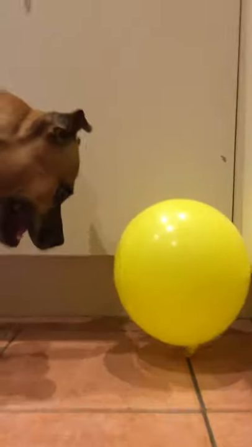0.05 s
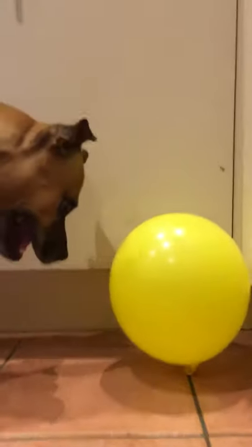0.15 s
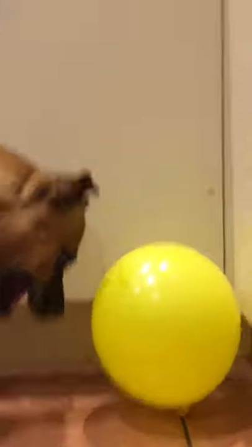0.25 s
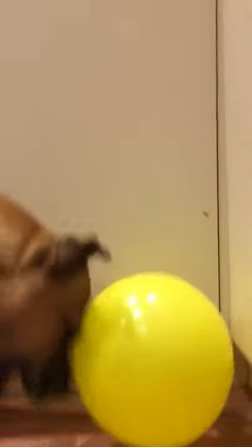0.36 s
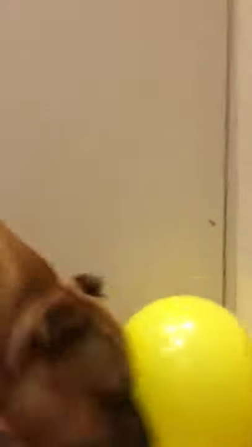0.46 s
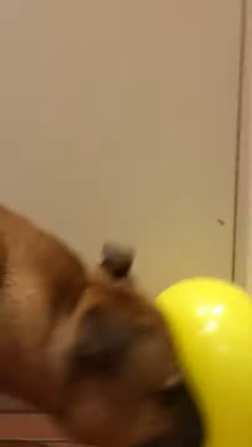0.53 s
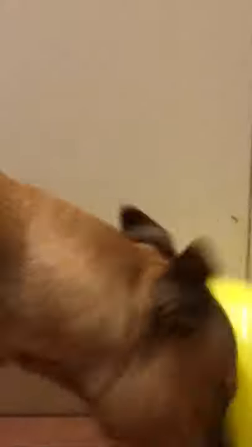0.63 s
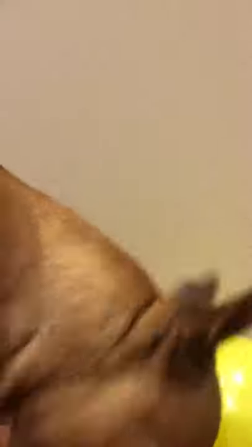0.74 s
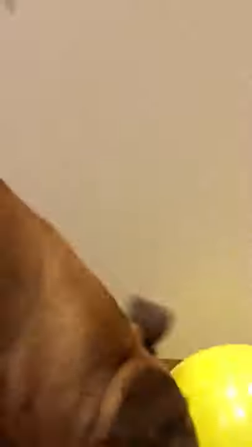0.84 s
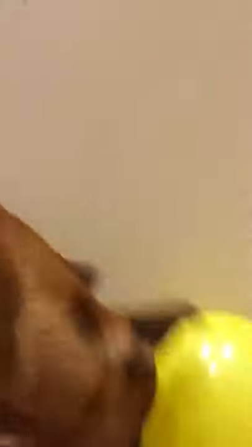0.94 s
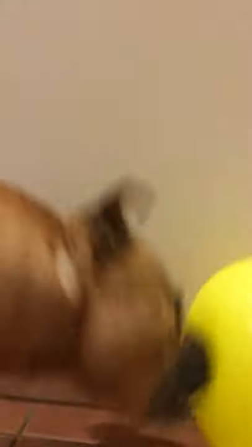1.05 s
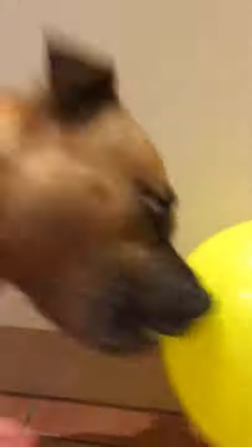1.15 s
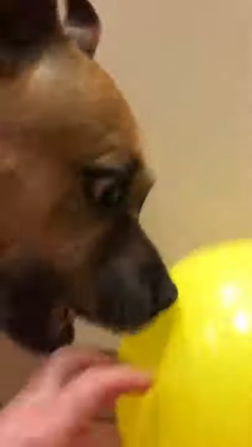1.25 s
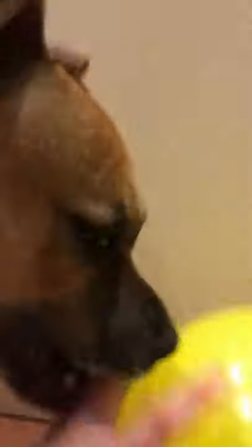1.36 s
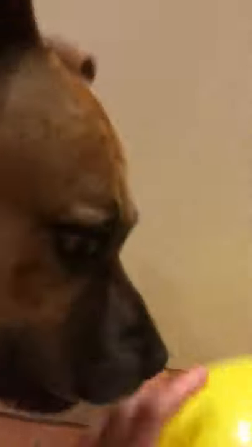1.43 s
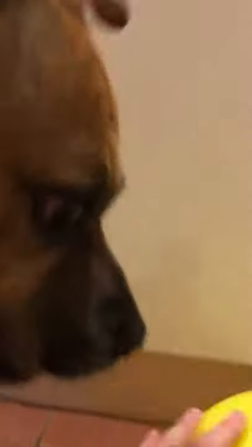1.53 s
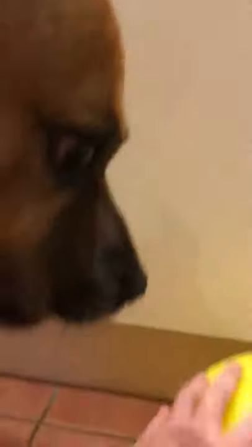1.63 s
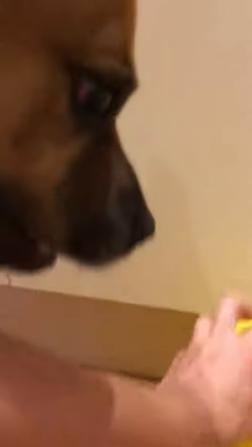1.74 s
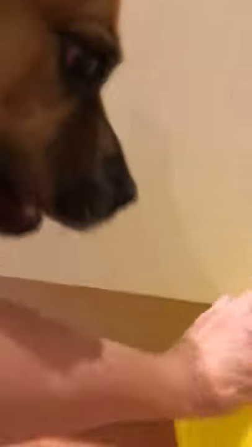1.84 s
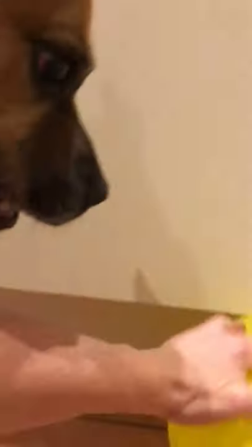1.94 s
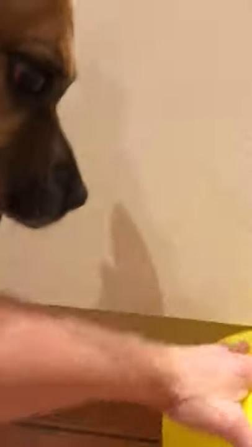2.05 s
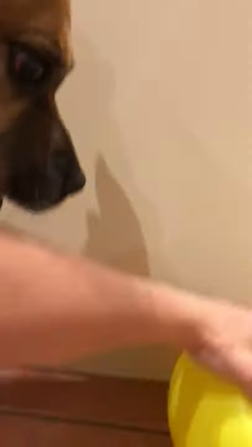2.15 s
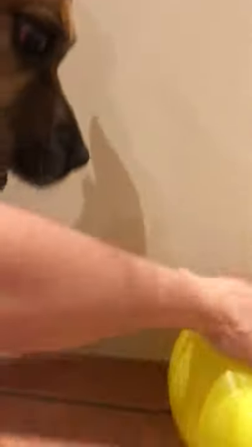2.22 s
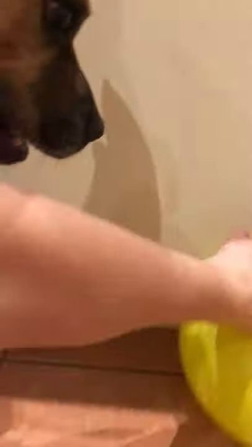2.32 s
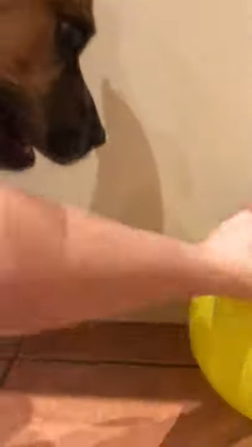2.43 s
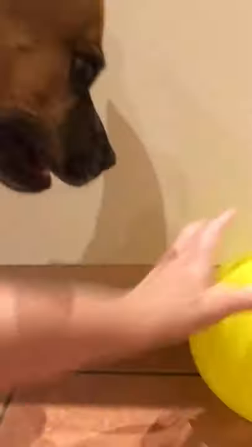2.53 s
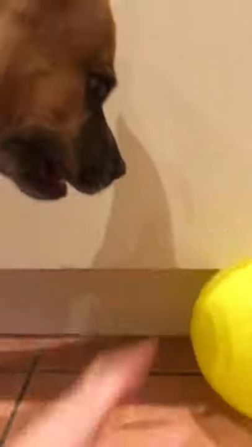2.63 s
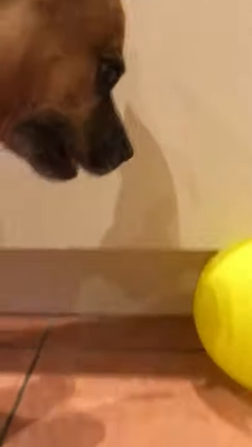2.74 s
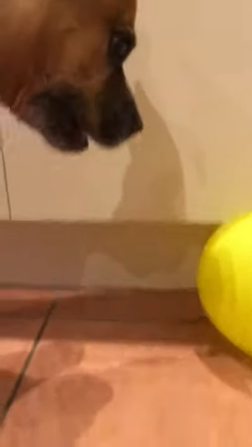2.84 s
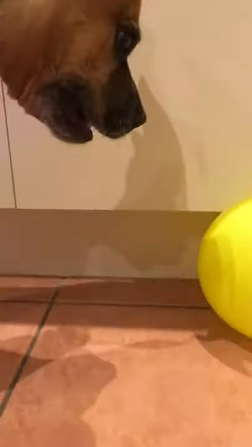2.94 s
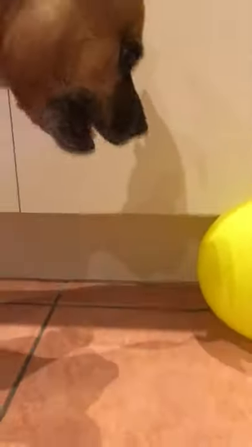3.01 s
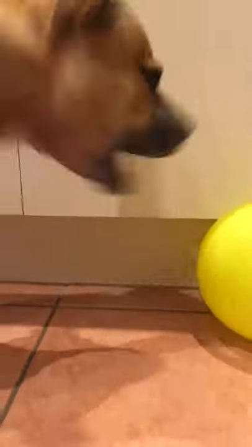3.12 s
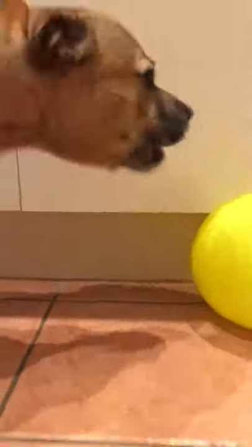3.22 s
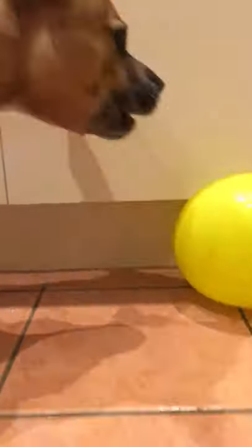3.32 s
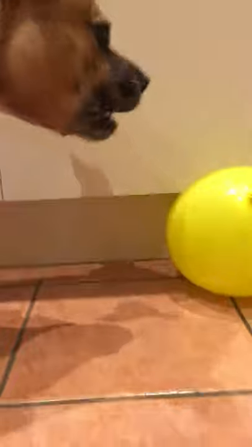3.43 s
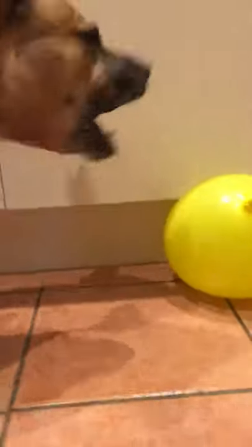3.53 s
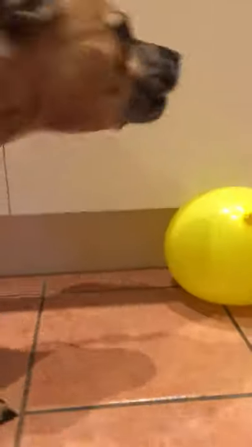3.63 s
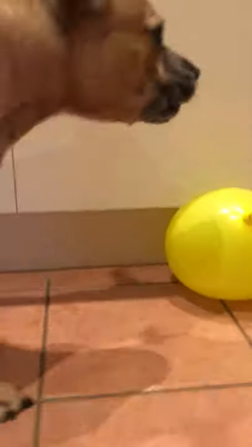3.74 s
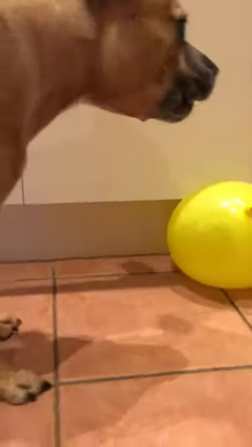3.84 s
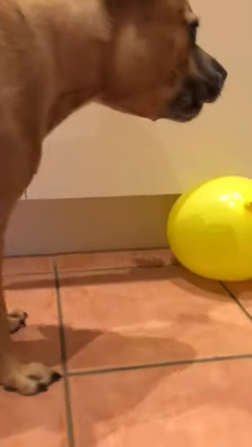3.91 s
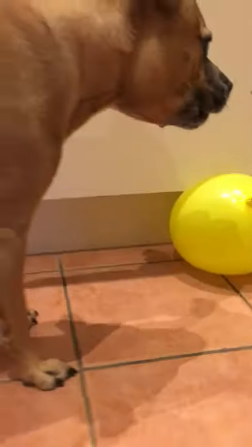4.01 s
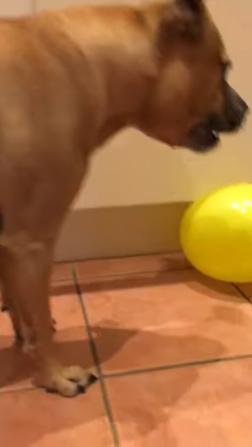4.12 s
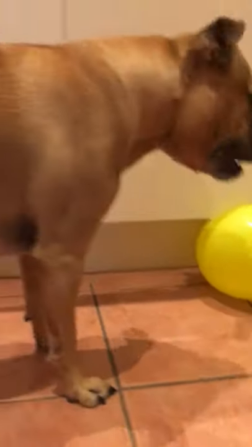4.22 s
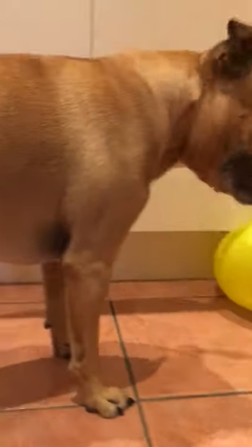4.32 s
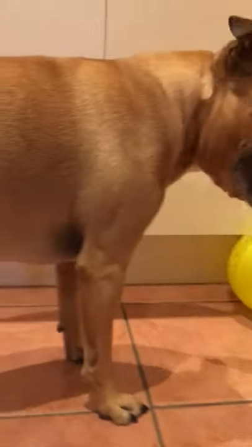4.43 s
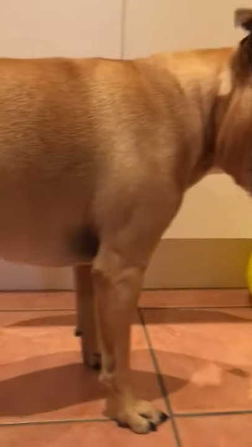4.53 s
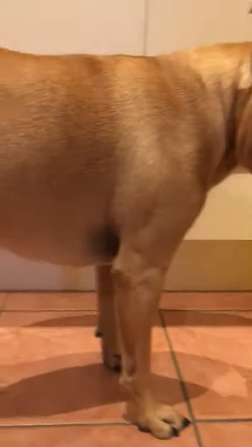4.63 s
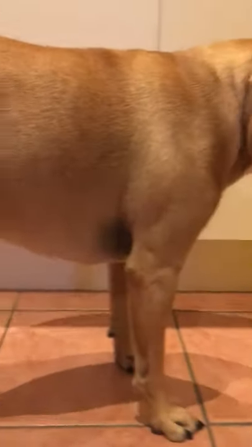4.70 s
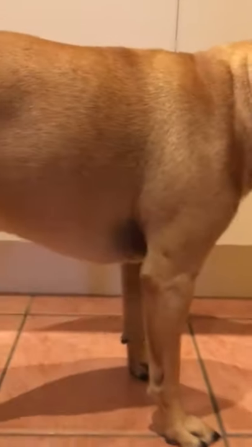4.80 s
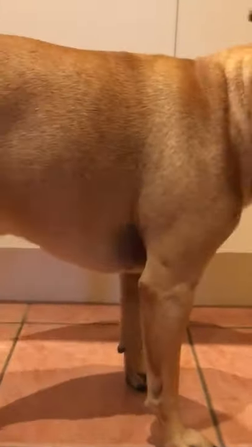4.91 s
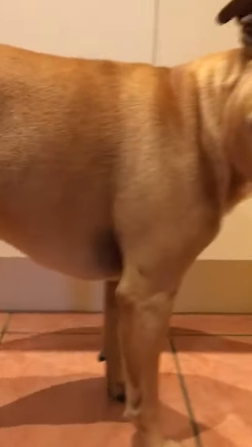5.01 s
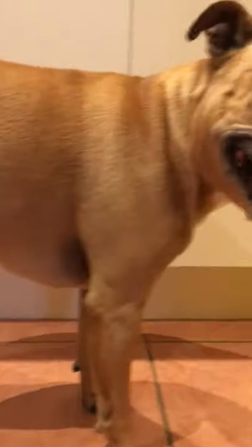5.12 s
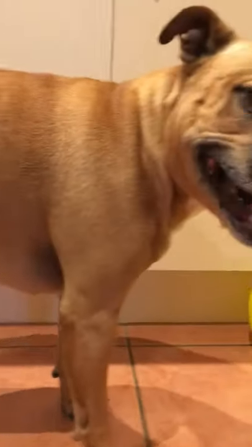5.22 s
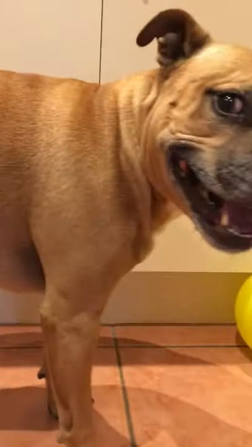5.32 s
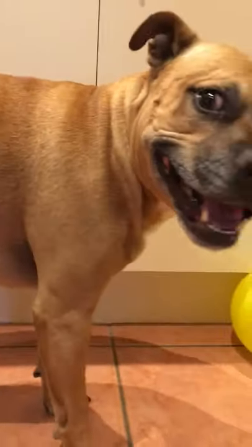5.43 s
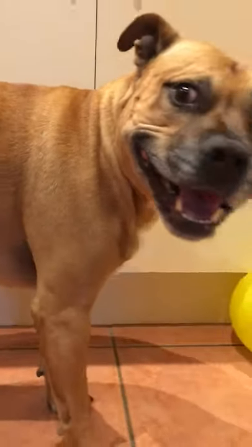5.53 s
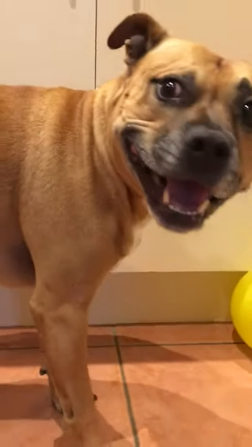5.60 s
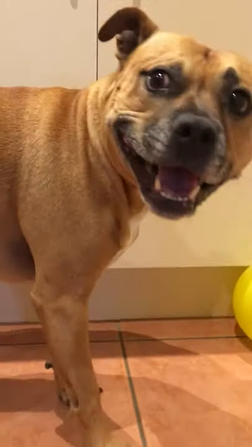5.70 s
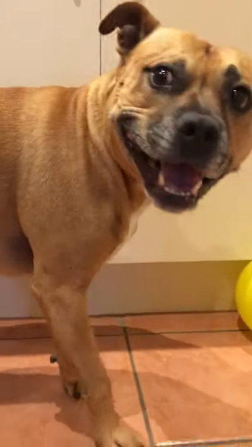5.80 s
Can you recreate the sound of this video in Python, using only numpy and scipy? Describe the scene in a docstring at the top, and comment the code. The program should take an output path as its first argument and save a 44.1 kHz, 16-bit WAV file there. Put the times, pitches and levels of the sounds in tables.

```python
"""A dog noses a rubber balloon over a tiled floor: it bumps, hums and hisses against fur, with claw ticks
and fluttering snorts. From 1.5 s a hand pats, rubs and plucks the rubber skin. At 3.2 and 3.6 s the dog
barks, close up: ragged glottal pulses and breath ring its throat and mouth, and the hard room answers.
The barks duck the recorder's gain for most of a second. Then the dog smacks its lips and pants softly
over the room's hum and hiss."""
import sys
import numpy as np
from scipy import signal
from scipy.fft import rfft, irfft, next_fast_len
from scipy.io import wavfile
from scipy.ndimage import uniform_filter1d, minimum_filter1d, map_coordinates

SR = 44100
rng = np.random.default_rng(int(sys.argv[2]) if len(sys.argv) > 2 else 0)


def int16_out(signal):
    """Quantize to a 16-bit WAV file."""
    q = np.round(np.clip(np.atleast_2d(signal).T, -1, 1) * 32767)
    wavfile.write(sys.argv[1], SR, q.astype(np.int16))


N = 258426
T = np.arange(N) / SR

# Levels in the tables are relative: each layer trims its own.
# The room's hum and hiss. Each row: frequency in Hz, level in dB.
ROOM_TONE_EQ = [(25, -14), (60, -1), (120, -5), (260, -16.5), (450, -21), (850, -19.5), (1100, -13.5),
                (1400, -20), (2200, -18), (3500, -29), (9300, -33), (11000, -40), (16000, -42)]
# Floor and door close by, then the whole room. Each row: frequency in Hz, t60 in seconds.
NEAR_DECAY = [(100, 0.14), (600, 0.22), (2500, 0.089), (10000, 0.23)]
ROOM_DECAY = [(100, 0.18), (380, 0.49), (560, 0.86), (1300, 0.79), (2500, 0.9), (4500, 0.64), (12000, 0.26)]
# Colour of the room's ring. Each row: frequency in Hz, gain in dB.
ROOM_EQ = [(100, -7.5), (390, 0), (600, -1.5), (1100, -3), (2500, -6), (3500, -1.5), (14000, -9)]

# Panted out-breaths. Each row: start in seconds, level in dB.
PANTS = [(4.483, -63.5), (4.8, -55), (5.1, -52.5), (5.42, -44.5), (5.774, -52)]
# Breath out through the muzzle, then the thinner breath in. Each row: frequency in Hz, level in dB.
EXHALE_EQ = [(260, -54), (450, -12), (506, -25), (612, -3), (1020, -11.5), (1540, -12.5), (2470, -17.5),
             (3720, -18.5), (4990, -28), (6600, -28), (15000, -47)]
INHALE_EQ = [(500, -30), (1100, 7), (2200, 0), (3500, -7), (8500, -9.5), (15000, -22)]
# A breathy nose whistle. Each row: start and length in seconds, level in dB, pitch in Hz.
WHISTLES = [(4.627, 0.094, -61, 4700)]
# Lips and tongue. Each row: start in seconds, level in dB, base of the resonances in Hz.
SMACKS = [(4.307, -34, 1400), (4.549, -35.5, 1200), (4.556, -35, 1170), (5.187, -32.5, 1290),
          (5.231, -34, 1300)]
# Snorts. Each row: start, length and attack in seconds, level in dB, nostril resonance in Hz.
SNORTS = [(0.624, 0.049, 0.027, -27.5, 1850), (0.718, 0.061, 0.0094, -50, 1290),
          (.772, 0.055, 0.015, -27, 2410), (1.236, 0.068, 0.0039, -31, 1600)]
# Resonances of the nose. Each row: centre and width in Hz, gain in dB.
NOSE_PEAKS = [(740, 190, 5), (1197, 350, 1.5), (1920, 180, -2.5), (2604, 110, 0), (3090, 114, 4),
              (5940, 6500, -8)]

# The balloon's modes. Each row: frequency in Hz, level in dB, nominal ring time in seconds.
BALLOON_MODES = [(131.5, -5.5, 0.48), (182, -6.5, 0.15), (231, -3.5, 0.12), (291, -5, 0.13),
                 (345, -1, 0.22), (421, -6, 0.086), (516, -10, 0.078), (610, -8.5, 0.14), (670, -8.5, 0.25),
                 (827, -7.5, .1), (959, -13, 0.052), (1120, -9.5, 0.071), (1300, -29, 0.087),
                 (1730, -20, 0.21)]
# The balloon slides softly over the floor, then rubber rubs on fur, then on a hand, then faint background hiss
# again. # Each row: time in seconds, hum level and hiss level in dB.
HISS_THEN_FUR = [(0.0, -65, -62), (0.512, -58, -55), (0.646, -45.5, -49.5), (0.752, -37.5, -43),
                 (0.852, -43, -53), (1.132, -40.5, -48.5), (1.26, -48, -55), (1.378, -60, -59),
                 (1.5, -56.5, -76.5)]
HAND_THEN_HISS = [(1.5, -57, -75), (1.606, -51, -53.5), (1.758, -47, -60.5), (2.022, -39.5, -66),
                  (2.174, -30.5, -39.5), (2.258, -35, -53.5), (2.406, -40.5, -51), (2.544, -48.5, -63),
                  (2.678, -57, -75), (2.784, -58.5, -62), (2.918, -60, -63), (3.16, -55, -56)]
# The hand skids. Each row: start and length in seconds, hum level and hiss level in dB.
SKIDS = [(1.742, 0.069, -32.5, -45.5), (1.943, .1, -45, -46), (2.509, .08, -47.5, -55)]
# Colour of the hiss. Each row: frequency in Hz, level in dB.
HISS_EQ = [(1470, -37), (2500, -7.5), (3080, -5.5), (3520, 0), (4370, -1), (9150, -2.5), (13200, -8),
           (16000, -16.5)]
# Ticks of claws, teeth and rubber. Each row: start in seconds, level in dB, brightness in Hz.
TICKS = [(0.2319, -36, 2800), (0.4643, -21, 8940), (0.9343, -16.5, 3270), (0.9454, -16, 3600),
         (1.3433, -19, 6350), (1.3464, -16, 5050), (1.3604, -18.5, 7350), (1.3768, -23, 3650),
         (2.3047, -22, 2260), (2.3231, -20.5, 2060), (2.3754, -29, 1520), (5.5009, -29.5, 8900)]
# Plucks of the skin. Each row: start in seconds, level in dB.
PLUCKS = [(0.72, -21), (2.266, -13.5), (2.354, -10)]
# Nose and hand hits. Each row: start in seconds, skin level and air push in dB, brightness in Hz.
BUMPS = [(0.463, -30.5, -40, 123), (0.489, -18.5, -29, 313), (0.511, -16, -38, 124), (0.548, -24, -31, 328),
         (0.62, -22.5, -39, 237), (0.783, -28, -26, 124), (0.991, -13.5, -26, 335),
         (1.011, -18.5, -33, 125), (1.087, -22, -18.5, 135), (1.584, -21, -31, 340),
         (1.63, -29, -27.5, 172), (1.676, -28, -33, 129), (1.738, -16.5, -52, 352), (1.76, -15, -39, 352),
         (1.902, -43, -55, 145), (2.203, -25, -32, 137), (2.427, -26, -53, 264), (2.56, -24.5, -37.5, 227),
         (2.749, -35.5, -46.5, 132)]

# Barks. Each row: start in seconds, effort in dB, attack, hold and tail in seconds, opening pitch in Hz,
# seconds until the jaw closes, throat level in dB with the jaw open and closed, rasp in dB.
BARKS = [(3.165, 8, .005, 0.12, 0.049, 437.8, .055, -8, 12, 4),
         (3.606, 7, .022, .08, .08, 402.9, .071, -3.5, 1.5, -4.5)]
# The chest thump opening each bark. Each row: start in seconds, level in dB, nominal pitch in Hz.
CHEST_THUMPS = [(3.167, 2.5, 192), (3.608, -16.5, 199)]
# Rasping resonances of the upper mouth. Each row: centre and width in Hz, gain in dB.
RASP_PEAKS = [(1637, 260, 9.5), (1886, 500, -6), (2100, 160, -10.5), (2304, 220, 2.5), (2610, 160, -3),
              (3290, 580, -13.5), (3680, 330, -13.5)]
# Breath rumbling in the chest and hissing past the teeth. Each row: frequency in Hz, level in dB.
BARK_BREATH_EQ = [(50, -5.5), (140, 15.5), (280, 15), (600, 0), (2800, -10), (4000, 0.5), (4900, -5),
                  (5600, 5), (6400, 3), (7300, 3.5), (9700, -0.5), (16000, -10)]


def amp(db):
    """Decibels to gain."""
    return 10 ** (np.asarray(db) / 20)


def unit(x):
    """Scaled to rms 1."""
    return x / np.sqrt(np.mean(x ** 2) + 1e-20)


def add(track, s, sound):
    """Mix a sound into a track at s seconds."""
    part = track[round(s * SR):][:len(sound)]
    part += sound[:len(part)]


def along(points, hz):
    """Read (Hz, value) points on a log frequency axis."""
    f, v = np.transpose(points)
    return np.interp(np.log(hz + 1), np.log(f + 1), v)


def wobble(rate, size):
    """A smooth random curve, rate knots a second."""
    return map_coordinates(rng.standard_normal(int(size * rate / SR) + 4), [np.arange(size) * rate / SR])


def filtered(x, response):
    """x through a complex frequency response."""
    m = next_fast_len(len(x) + 8192)
    return irfft(rfft(x, m) * response(np.fft.rfftfreq(m, 1 / SR)), m)[:len(x)]


def coloured(x, eq):
    """x through a (Hz, dB) EQ curve, at rms 1."""
    return unit(filtered(x, lambda f: amp(along(eq, f))))


def resonate(x, peaks):
    """x through (Hz, width, dB) resonances of alternating polarity, at rms 1."""
    return unit(filtered(x, lambda f: sum((-1) ** k * amp(db) * 1j * f * w / (c * c - f * f + 1j * f * w)
                                          for k, (c, w, db) in enumerate(peaks))))


def glide(x, hz, width_hz):
    """x through a steep resonance that follows hz, its slow swells evened out."""
    turn = np.exp(2j * np.pi * np.cumsum(hz) / SR)
    band = signal.sosfilt(signal.butter(2, width_hz / 2, fs=SR, output="sos"), x / turn)
    return np.real(band * turn) / np.sqrt(abs(uniform_filter1d(abs(band) ** 2, size=900)) / 2 + 1e-12)


def swell(length):
    """Time axis and half-sine envelope, length in seconds."""
    t = np.arange(int(length * SR)) / SR
    return t, np.sin(np.pi * t / length)


def room_tone(level_db=-53, drift_db=2):
    """A bed of soft hum and hiss, drifting in patches of frequency and time."""
    spectrum = signal.stft(rng.standard_normal(N), nperseg=512)[2]
    patches = uniform_filter1d(rng.standard_normal(spectrum.shape), size=12, axis=0)
    patches = unit(uniform_filter1d(patches, size=18, axis=1))
    noise = signal.istft(spectrum * amp(drift_db * patches), nperseg=512)[1][:N]
    return amp(level_db) * coloured(noise, ROOM_TONE_EQ)


def reverb(x, decay, predelay_s):
    """Diffuse reflections in which each frequency dies at its own speed."""
    hz, t, spectrum = signal.stft(rng.standard_normal(SR), SR, nperseg=256)
    tail = signal.istft(spectrum * amp(-60 * t / along(decay, hz)[:, None]), SR, nperseg=256)[1]
    tail /= np.sqrt(np.mean(abs(rfft(tail, SR)[500:2500]) ** 2))  # unity gain in the mids
    return signal.fftconvolve(x, np.pad(tail, (int(predelay_s * SR), 0)))[:N]


def panting(pant_s=.099, inhale_after_s=.16, inhale_db=-61.5):
    """Soft puffs through the open muzzle, each with a thinner in-breath, and a faint nose whistle."""
    out = np.zeros(N)
    t, shape = swell(pant_s)
    for s, db in PANTS:
        envelope = amp(db + 1.6 * wobble(120, len(t))) * shape ** 2
        add(out, s, envelope * coloured(rng.standard_normal(len(t)), EXHALE_EQ))
        inhale = coloured(rng.standard_normal(len(t)), INHALE_EQ)
        add(out, s + inhale_after_s, amp(inhale_db) * shape * inhale)
    for s, length, db, hz in WHISTLES:
        t, shape = swell(length)
        whistle = glide(rng.standard_normal(len(t)), np.full(len(t), hz), width_hz=600)
        add(out, s, amp(db) * shape * whistle)
    return out


def lip_smacks(t60=.017):
    """Wet little clicks of lips and tongue ring the mouth."""
    out, t = np.zeros(N), np.arange(SR // 20) / SR
    for s, db, hz in SMACKS:
        click = rng.standard_normal(len(t)) * amp(-60 * t / t60)
        smack = resonate(click, [(.916 * hz, 160, 0), (1.19 * hz, 250, -2), (1.5 * hz, 400, -8)])
        add(out, s, amp(db) * smack / abs(smack).max())
    return out


def snorts(flutter_db=1, flap_hz=440, flap_mix=.41):
    """Short fluttering blasts through the nose, buzzing with the flapping nostrils."""
    out = np.zeros(N)
    for s, length, attack, db, hz in SNORTS:
        t = np.arange(int(length * SR)) / SR
        shape = np.minimum(t / attack, 1) * np.sqrt(1 - (t / length) ** 2)
        cycles = np.cumsum(flap_hz * (1 + .03 * wobble(150, len(t)))) / SR
        flaps = unit(np.diff(np.floor(cycles), prepend=0))
        air = (rng.standard_normal(len(t)) + flap_mix * flaps) * amp(flutter_db * wobble(280, len(t)))
        add(out, s, amp(db) * shape * resonate(resonate(air, NOSE_PEAKS), [(hz, .37 * hz, 0)]))
    return out


def faders(t):
    """Hum and hiss levels in dB at the times t."""
    s, hum_db, hiss_db = np.transpose(list(HISS_THEN_FUR) + list(HAND_THEN_HISS))
    return np.interp(t, s, hum_db), np.interp(t, s, hiss_db)


def rubbing(hum_db=-2, sway_db=-20, scrape_db=-5, hiss_db=-1, hum_floor_db=-61.5, firm_db=-48.5,
            jerks_per_s=32):
    """Tiny slips of the rubber hiss, scrape and keep its modes humming while the whole balloon sways. Before
    the rubbing the balloon slides faintly over the floor; faint background hiss lies after it."""
    hum_gain, hiss_gain = amp(faders(T)) * (T < HAND_THEN_HISS[-1][0])
    hum_gain = np.maximum(hum_gain - amp(hum_floor_db), 0)  # below this level the hum is silent
    for s, length, low_db, high_db in SKIDS:
        add(hum_gain, s, amp(low_db) * swell(length)[1])
        add(hiss_gain, s, amp(high_db) * swell(length)[1])
    slips = rng.standard_normal(N) * amp(4 * wobble(1500, N) + 1.5 * wobble(90, N))
    # firm rubbing crackles with single larger slips
    jerks = (rng.random(N) < jerks_per_s / SR) & (hum_gain > amp(firm_db))
    slips *= 1 + amp(4.5) * np.convolve(jerks, np.exp(-np.linspace(0, np.pi, SR // 600)))[:N]
    hum = resonate(slips, [(hz, 5 / ring_s, db) for hz, db, ring_s in BALLOON_MODES])
    lumps = rng.standard_normal(N) * amp(3 * wobble(27, N))
    sway = resonate(lumps, [(51.1, 30, -3.5), (108, 63, -1.5)])
    scrape = coloured(slips, [(400, -39), (900, -9.5), (1500, 8), (3000, -4.5), (5000, -21)])
    return (amp(hum_db) * hum_gain * hum
            + amp(sway_db) * hum_gain ** .53 * sway
            + amp(scrape_db) * np.sqrt(hum_gain * hiss_gain) * scrape
            + amp(hiss_db) * hiss_gain * coloured(slips, HISS_EQ))


def ticks_and_plucks(crack_t60=.0084, shiver_t60=.029, pop_t60=.032, tick_db=-2, pluck_db=-5,
                     pluck_hz=4500, pop_db=1):
    """A sharp crack, a short shiver of the skin and, for a pluck, a pop around 1 kHz."""
    out, t = np.zeros(N), np.arange(SR // 12) / SR
    ticks = [(s, db + tick_db, hz, 0) for s, db, hz in TICKS]
    plucks = [(s, db + pluck_db, pluck_hz, amp(pop_db)) for s, db in PLUCKS]
    envelope = amp(-60 * t / crack_t60) + amp(11.5 - 60 * t / shiver_t60)
    for s, db, bright_hz, pop_gain in ticks + plucks:
        crack_noise, pop_noise = rng.standard_normal((2, len(t)))
        crack = resonate(crack_noise * envelope, [(bright_hz, .85 * bright_hz, 0)])
        pop = resonate(pop_noise * amp(-60 * t / pop_t60), [(1080, 710, 5.5), (1720, 710, -.5)])
        add(out, s, amp(db) * (crack / abs(crack).max() + pop_gain * pop / abs(pop).max()))
    return out


def balloon_hit(db, push_db, bright_hz, push_hz=58, push_t60=.16, attack_s=.0017, slap_db=-5,
                slap_t60=.062):
    """A hit slaps the skin, rings the modes around bright_hz and shoves out a low pulse of air."""
    t = np.arange(SR // 5) / SR
    hz, mode_db, ring_s = np.transpose(BALLOON_MODES)[:, :, None]
    scatter, detune = rng.standard_normal((2, len(BALLOON_MODES), 1))
    phase = rng.uniform(0, 2 * np.pi, hz.shape)
    contact = 1 / (1 + (hz / (2.1 * bright_hz)) ** 2.7) / np.sqrt(1 + (.79 * bright_hz / hz) ** 4)
    # squeezing the balloon damps it and retunes it a little at every hit
    decay = amp(mode_db + 3.1 * scatter - 60 * t / (.75 * ring_s))
    ring = np.sum(contact * decay * np.sin(2 * np.pi * hz * (1 + .06 * detune) * t + phase), 0)
    slap = filtered(rng.standard_normal(len(t)), lambda f: 1 / (1 + (f / (2 * bright_hz)) ** 2.2))
    slap *= amp(-60 * t / slap_t60)
    skin = (ring / abs(ring).max() + amp(slap_db) * slap / abs(slap).max()) * (1 - np.exp(-t / attack_s))
    push = np.sin(2 * np.pi * push_hz * (1 + .072 * detune[0]) * t)
    push *= amp(-60 * t / push_t60) * (1 - np.exp(-t / .0037))
    return amp(db) * skin + amp(push_db) * push


def jostles(count=30, per_s=17, spread_db=5.5):
    """Light chance touches after the first bump, riding the level of the rubbing hum."""
    out = np.zeros(N)
    for k, (late, size) in enumerate(rng.uniform(-1, 1, (count, 2))):
        s = BUMPS[0][0] + (k + 1 + late / 2) / per_s
        db = faders(s)[0] + spread_db * size
        add(out, s, balloon_hit(db + 7, db - 4, bright_hz=304, push_hz=106, push_t60=.071))
    return out


def bumps(skin_trim_db=-2, push_trim_db=5):
    """The clear hits of nose and hand on the balloon."""
    out = np.zeros(N)
    for s, db, push_db, bright_hz in BUMPS:
        add(out, s, balloon_hit(db + skin_trim_db, push_db + push_trim_db, bright_hz))
    return out


def bark_voice(effort_db, attack, hold, tail, opening_hz, jaw_time, open_db, closed_db, strain_db,
               jaw_s=.008, lips_s=.023, closed_hz=309.3, sag_hz_per_s=750, mouth_shut_hz=800,
               jitter=.038, breathiness=.62, teeth_db=-25, chest_db=-35):
    """Ragged glottal pulses and gated breath ring a throat and mouth that close as the pitch falls."""
    t = np.arange(int((hold + tail) * SR)) / SR
    in_tail = np.maximum(t - hold, 0)
    jaw = .5 + .5 * np.tanh((t - jaw_time) / (2 * jaw_s))  # 0 open, 1 shut, as for the lips
    lips = 1 - np.exp(-in_tail / lips_s)
    level_db = effort_db - 31 * np.maximum(1 - t / attack, 0)
    level_db -= 6 * (1 - np.exp(-in_tail / .011)) + 9 * in_tail / tail  # a sudden drop, then a fade
    pitch = opening_hz + (closed_hz - opening_hz) * jaw - sag_hz_per_s * in_tail
    throat_hz = 2 * pitch  # the throat rides on the second harmonic
    mouth_hz = 3 * opening_hz * (1 - lips) + mouth_shut_hz * lips  # the mouth starts on the third
    throat_db = open_db + (closed_db - open_db) * jaw - 4.5 * lips
    # rasp builds with strain and is muffled by the lips
    rasp_db = strain_db - 20.5 * np.maximum(1 - (t / .045) ** 2, 0) + 2 * jaw - 11.5 * lips
    cycles = np.cumsum(pitch * (1 + jitter * wobble(450, len(t)))) / SR
    pulses = unit(np.diff(np.floor(cycles), prepend=0) * amp(4 * wobble(400, len(t))))
    breath = unit(rng.standard_normal(len(t)) * (2.8 + np.cos(2 * np.pi * cycles)))
    # the higher the resonance, the more of its drive is turbulence
    throat = glide(pulses + breathiness * breath, throat_hz, width_hz=200)
    mouth = glide(pulses + 2 * breathiness * breath, mouth_hz, width_hz=280)
    rasp = resonate(pulses + 3 * breathiness * breath, RASP_PEAKS)
    rasp = unit(filtered(rasp, lambda f: 1 / (1 + (f / 4700) ** 8)))
    voice = amp(throat_db) * throat + amp(-1 * jaw) * mouth + amp(rasp_db) * rasp
    voice /= np.sqrt(1 + amp(throat_db) ** 2 + amp(rasp_db) ** 2)
    voice = filtered(voice, lambda f: 1 - 1 / (1 + (f / 400) ** 6))  # the muzzle radiates little bass
    hiss = coloured(breath + .6 * pulses, BARK_BREATH_EQ)
    hiss *= amp(teeth_db + .25 * rasp_db + wobble(95, len(t)))
    chest = amp(chest_db) * np.sin(2 * np.pi * cycles)
    return amp(level_db) * (voice + hiss + chest) * np.clip((t[-1] - t) / .0075, 0, 1)


def barks(spit_db=-9):
    """Each bark layers the voice with an opening down-swept chest thump and a spit of air."""
    out = np.zeros(N)
    for s, *settings in BARKS:
        add(out, s, bark_voice(*settings))
    t, shape = swell(.022)
    for s, db, hz in CHEST_THUMPS:
        thump = np.sin(2 * np.pi * hz * t * (1.3 - 20 * t))
        spit = amp(spit_db) * coloured(rng.standard_normal(len(t)), BARK_BREATH_EQ)
        add(out, s, amp(db) * shape * (thump + spit))
    return out


def scene(near_db=-9, room_db=-18):
    """Dog and balloon up front, with close reflections, the room's longer ring and its tone behind."""
    direct = (barks() + bumps() + jostles() + rubbing() + ticks_and_plucks()
              + snorts() + panting() + lip_smacks())
    room = filtered(reverb(direct, ROOM_DECAY, predelay_s=.02), lambda f: amp(along(ROOM_EQ, f)))
    bed = room_tone()
    near = reverb(direct, NEAR_DECAY, predelay_s=.003)
    return (direct + amp(near_db) * near + amp(room_db) * room + bed)[None]


def record(dry, low_cut_hz=26, threshold_db=-3.5, hold_s=.73, release_db_per_s=55, makeup_db=1,
           ceiling=.9, high_cut_hz=16000):
    """Low cut, gain control that ducks at once, holds and recovers, a fast limiter, a steep high cut."""
    x = signal.sosfilt(signal.butter(2, low_cut_hz, "high", fs=SR, output="sos"), dry[0])
    level_db = 10 * np.log10(abs(uniform_filter1d(x ** 2, size=400)) + 1e-12)
    span = 2 * int(hold_s * SR / 2) + 1
    duck_db = -minimum_filter1d(np.minimum(threshold_db - level_db, 0), span, origin=span // 2)
    duck_db = np.maximum.accumulate(duck_db + release_db_per_s * T) - release_db_per_s * T
    x = x * amp(makeup_db - duck_db)
    limiter_gain = np.minimum(1, ceiling / (abs(x) + 1e-9))
    x = x * uniform_filter1d(minimum_filter1d(limiter_gain, size=61), size=61)
    return filtered(x, lambda f: 1 / np.sqrt(1 + (f / high_cut_hz) ** 160))[None]


dry = scene()
out = record(dry)
int16_out(out)
```